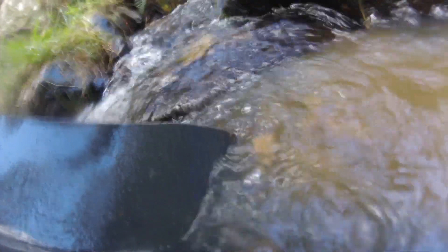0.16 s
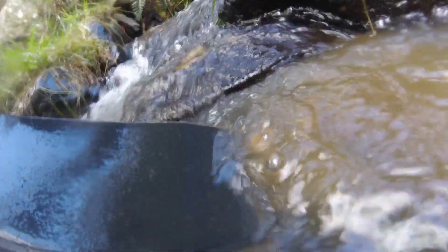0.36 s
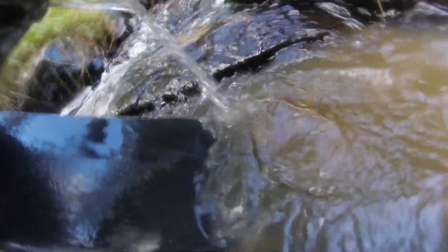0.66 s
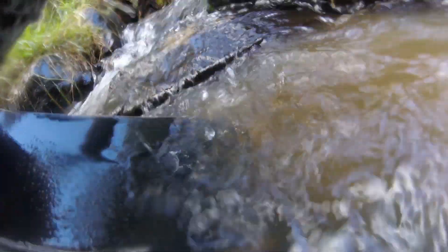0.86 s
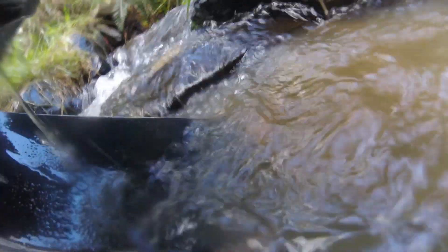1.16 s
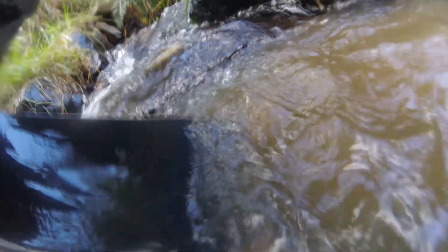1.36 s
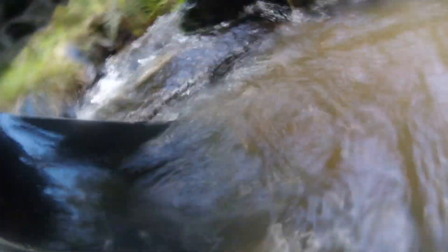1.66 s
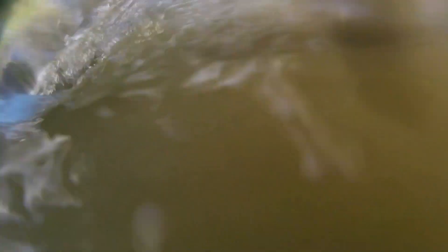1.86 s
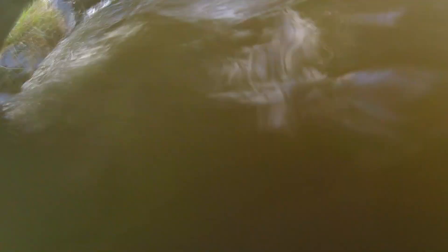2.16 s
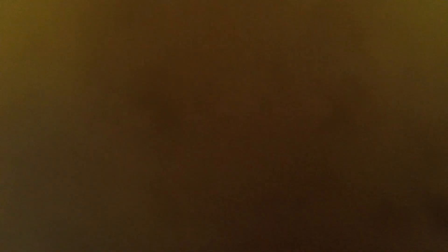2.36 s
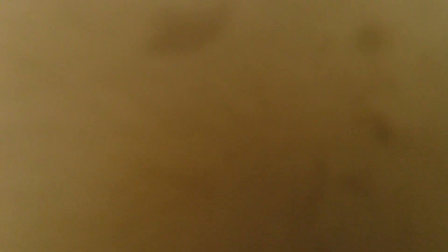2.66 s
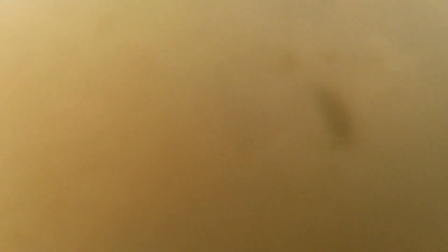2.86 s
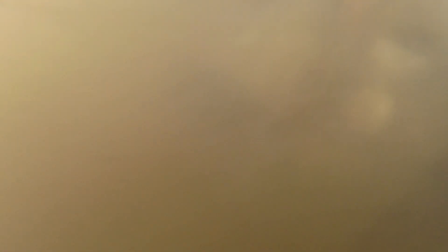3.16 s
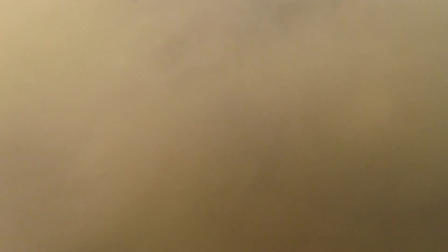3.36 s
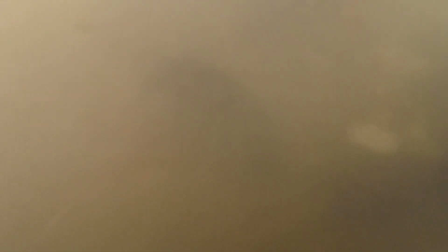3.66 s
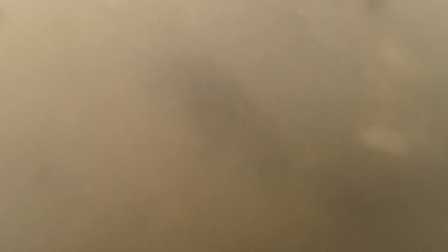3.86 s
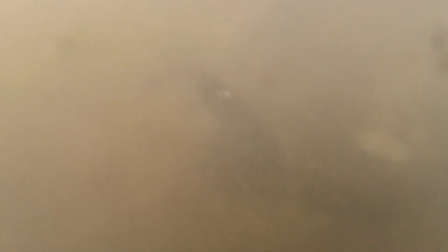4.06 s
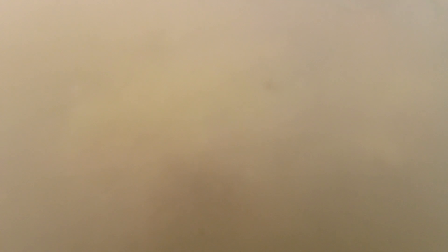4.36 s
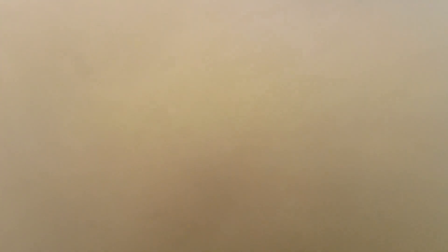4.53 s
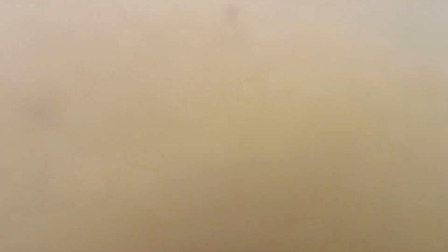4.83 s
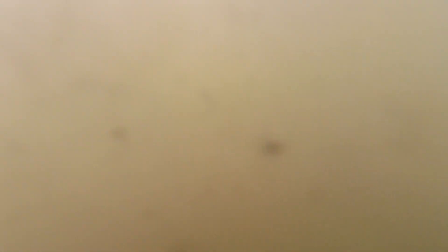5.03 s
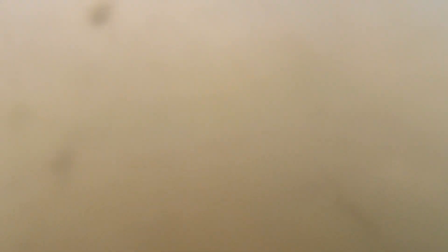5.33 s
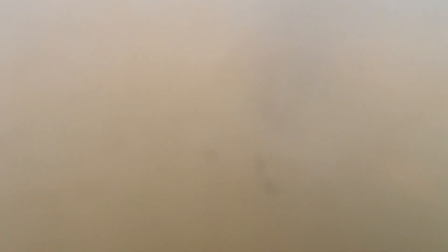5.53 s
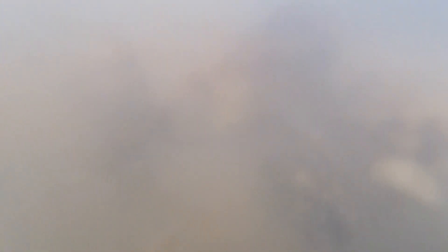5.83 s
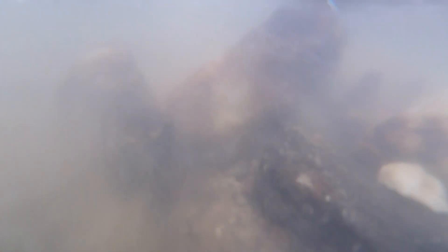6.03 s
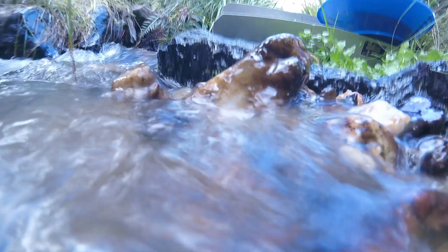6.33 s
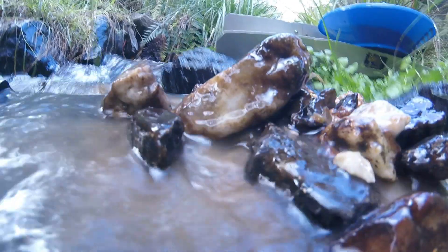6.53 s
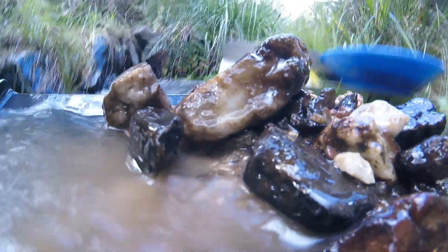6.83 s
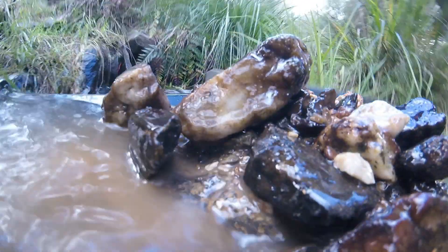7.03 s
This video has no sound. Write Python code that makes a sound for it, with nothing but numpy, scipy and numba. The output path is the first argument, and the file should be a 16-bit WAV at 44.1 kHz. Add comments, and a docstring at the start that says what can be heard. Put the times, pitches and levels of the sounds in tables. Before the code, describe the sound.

Close, mono and enclosed sound from a waterproof camera dipped in a creek. First come rough surface lapping, deep buffeting, bright spray and high sputtering ringing. After a brief lull it sinks with a bubble's gulp, and boxy stone knocks, gritty grinding, pebble taps and glugs crowd together. Finally the case jolts into air, rings low, sheds a few drops, and the muffled creek runs quietly.

```python
"""A stony creek, into which a waterproof camera is dipped and lifted out again.
At the surface the current slaps the case and fizzes and rings in the wet microphone port: filtered clicks, swept resonances.
Under water, stones knock and gravel scrapes: short contacts ring the modes of the flooded case while bubbles gurgle.
Back in air the case rings on and sheds drops, and the creek rushes on dully behind the wet port as coloured clicks."""
import sys
import numpy as np
from scipy import signal
from scipy.fft import rfft, irfft
from scipy.io import wavfile
from scipy.ndimage import uniform_filter1d, minimum_filter1d, map_coordinates
from numba import njit

SR = 44100
rng = np.random.default_rng(int(sys.argv[2]) if len(sys.argv) > 2 else 0)


def transcribe(u):
    """Save the signal u as a 16-bit wav file named by the first command-line argument.

    u: samples, shape (n,) or (channels, n), limited to [-1, 1]; the rate is SR.
    q: integer samples, one column per channel.
    """
    v = np.clip(np.atleast_2d(u).T, -1, 1)
    q = np.round(v * 32767).astype(np.int16)
    wavfile.write(sys.argv[1], SR, q)


N = 317199
TIME = np.arange(N) / SR
HIT = TIME[:8192]  # time axis of one short sound

# Moments of the dip: first water, last bright sheet, port sealed, case under water, case back in air
START_S, FLOOD_S, SEALED_S, PLUNGE_S, SURFACE_S = .076, 2.165, 2.229, 2.265, 6.25

# Modes of the flooded case: (frequency [Hz], width [Hz], level [dB])
FLOODED_MODES = [(91.2, 16, 2.5), (200.8, 33, -3), (274, 59, -11), (341, 65, -1), (398.7, 38, 0),
                 (512, 110, -6), (569.5, 16, -7), (701, 23.3, 5.5), (781, 69, -1.5), (886, 77, -8),
                 (945.5, 61, -3.5), (1260, 21, -20.5), (1670, 79, -13.5), (2030, 78, -17),
                 (2300, 110, -26.5), (2630, 65, -33), (3630, 160, -44.5), (5000, 140, -41),
                 (6240, 220, -52)]
# Spectrum of fizz in the wet port: (frequency [Hz], level [dB])
FIZZ_SPECTRUM = [(2500, -14), (4300, -3), (5400, 7.5), (6500, 5.5), (7800, -2), (9500, -11), (12000, -20.5),
                 (13500, -47.5)]
# Spectrum of a dull crack under water: (frequency [Hz], level [dB])
CRACK_SPECTRUM = [(100, -13), (400, 1), (900, -5), (1300, -13.5), (2100, -13), (2800, -25), (3400, -40),
                  (5200, -46.5), (8000, -60.5), (15000, -81.5)]
# Spectrum of water pattering: (frequency [Hz], level [dB])
PATTER_SPECTRUM = [(300, -30), (900, 11), (1300, -2), (2000, 10), (2800, -7), (3700, -5), (4300, -17),
                   (6000, -24), (9000, -50)]


def undb(db):
    """Decibels to gain."""
    return 10 ** (np.asarray(db) / 20)


def unit(x):
    """Scale to rms 1."""
    return x / np.sqrt(np.mean(x ** 2))


def peak(x):
    """Scale to peak 1."""
    return x / np.abs(x).max()


def between(start, end, ramp):
    """Gate from start to end with inside ramps, in seconds; it stays below 1 if the ramps do not fit."""
    return np.clip(np.minimum(TIME - start, end - TIME) / ramp, 0, 1)


def fade(t60):
    """Exponential decay of a hit, 60 dB in t60 seconds."""
    return np.exp(-np.log(1000) * HIT / t60)


def add(out, s, sound):
    """Mix a sound in at s seconds."""
    i = max(int(s * SR), 0)
    out[i:i + len(sound)] += sound[:N - i]


def noise_hit():
    """White noise as long as one short sound."""
    return rng.standard_normal(len(HIT))


def cut(x, hz, kind, order=3):
    """Low-, high- or band-pass."""
    return signal.sosfilt(signal.butter(order, hz, kind, fs=SR, output="sos"), x)


def colour(x, points, size=4096):
    """Minimum-phase filter that follows a (Hz, dB) spectrum."""
    hz, db = np.transpose(points)
    bins_hz = np.arange(size // 2 + 1) * SR / size
    gain = undb(np.interp(np.log(bins_hz + 1), np.log(hz), db))
    # Folding the cepstrum makes the filter causal
    cepstrum = irfft(np.log(gain))
    cepstrum[1:size // 2] *= 2
    cepstrum[size // 2 + 1:] = 0
    impulse = irfft(np.exp(rfft(cepstrum)))
    return signal.fftconvolve(x, impulse)[:len(x)]


def resonate(x, hz, width):
    """One resonance, gain 1 at its centre."""
    return signal.lfilter(*signal.iirpeak(hz, hz / width, fs=SR), x)


def ring(x, modes, scatter_db, detune=0):
    """Modes driven by x; each contact weights and detunes them anew, and none carries far above its pitch."""
    chance = rng.standard_normal((len(modes), 3))
    out = 0
    for (hz, width, db), (sign, weight, shift) in zip(modes, chance):
        mode = resonate(x, hz * (1 + detune * shift), width)
        mode = resonate(mode, hz, hz)  # a broad second pass drops what lies far from the mode
        out = out + np.sign(sign) * undb(db + scatter_db * weight) * mode
    return out


@njit
def glide(x, hz, width):
    """A resonance whose centre moves from sample to sample."""
    y, band, low = np.empty(len(x)), 0., 0.
    for i in range(len(x)):
        g, k = np.tan(np.pi * hz[i] / SR), width / hz[i]
        v = (band + g * (x[i] - low)) / (1 + g * (g + k))
        band, low, y[i] = 2 * v - band, low + 2 * g * v, k * v
    return y


def walk(rate):
    """Smooth random wandering with rate new values a second, spread near 1."""
    k = int(SR / rate)
    steps = np.repeat(rng.standard_normal(N // k + 1), k)
    return 1.3 * uniform_filter1d(uniform_filter1d(steps, k), k)[:N]


def wander(x, depth, rate):
    """Let the pitch of a steady sound drift by a share, as water and grip load the case."""
    position = np.cumsum(1 + depth * walk(rate))
    return map_coordinates(x, [position], order=3, mode="mirror")


def clicks(rate, spread_db, size=2048):
    """Random clicks of very unequal strength whose power stays even over longer stretches."""
    hits = rng.random(N) < rate / SR
    x = hits * rng.standard_normal(N) * undb(spread_db * rng.exponential(size=N))
    return x / np.sqrt(np.abs(uniform_filter1d(x ** 2, size)) + 1e-9)


def bubbles(low_hz, high_hz, count, cycles=24, rise=0.21):
    """Small bubbles swell within a cycle, ring a few more and glide up as they near the surface; rms 1."""
    out, t = np.zeros(N), HIT[:4096]
    for when, pitch, strength in rng.random((count, 3)):
        hz = low_hz * (high_hz / low_hz) ** pitch
        age = hz * t / cycles  # 1 when the ring has fallen by 60 dB
        envelope = (1 - np.exp(-(2 * hz * t) ** 2)) * np.exp(-np.log(1000) * age)
        tone = np.sin(2 * np.pi * hz * t * (1 + rise * age / 2))
        add(out, when * TIME[-1], undb(-18 * strength) * envelope * tone)
    return unit(out)


def swells(rows, attack, t60, rest_db):
    """Gain of (start s, length s, dB) swells: each rises, holds and dies away to a resting level."""
    gain = np.full(N, undb(rest_db))
    for s, length, db in rows:
        t = TIME[:N - int(s * SR)]
        decay = np.exp(-np.log(1000) * np.clip((t - length) / t60, 0, 2))
        shape = np.minimum(t / attack, 1) * decay
        gain[-len(t):] = np.maximum(gain[-len(t):], undb(db) * shape)
    return gain


def dragging():
    """How hard pushes of the camera over the bed scrape it, and how much they churn the water."""
    # Pushes: (start [s], length [s], scrape level [dB], churn level [dB])
    pushes = [(2.256, 0.034, -14.5, -18), (2.567, 0.033, -24.5, -28.5), (2.794, 0.035, -29.5, -25.5),
              (2.964, 0.14, -24, -17.5), (3.113, 0.12, -19.5, -22), (3.321, 0.22, -21, -22.5),
              (3.516, 0.13, -14, -23), (3.712, 0.39, -15.5, -17.5), (4.084, 0.03, -13.5, -21),
              (4.181, 0.089, -17.5, -20), (4.282, 0.12, -15, -24), (4.43, 0.084, -22, -26),
              (4.547, 0.12, -30.5, -33), (4.646, 0.13, -23, -25), (4.802, 0.036, -25.5, -25),
              (4.903, 0.074, -19, -18), (5.049, 0.1, -26, -30), (5.166, 0.097, -22.5, -18),
              (5.342, 0.11, -29.5, -30.5), (5.443, 0.19, -34.5, -34.5), (5.602, 0.12, -25.5, -29),
              (5.717, 0.097, -17.5, -19), (5.828, 0.19, -29, -23), (6.078, 0.23, -30, -39),
              (6.192, 0.03, -21, -23)]
    attack_s, t60_s = 0.027, 0.42
    s, length, scrape, churn = np.transpose(pushes)
    return (swells(zip(s, length, scrape), attack_s, t60_s, rest_db=-37),
            swells(zip(s, length, churn), attack_s, t60_s, rest_db=-36.5))


def current():
    """How strongly surges of the current wash along the case, sway it and fizz over the port."""
    # Surges: (start [s], length [s], wash level [dB], sway level [dB], fizz level [dB])
    surges = [(0.07, 0.1, -39.5, -18, -60), (0.15, 0.17, -31.5, -18.5, -54.5), (0.386, 0.12, -30, -21, -46),
              (0.717, 0.098, -28, -17, -37.5), (0.863, 0.082, -26.5, -21.5, -44),
              (0.97, 0.038, -33, -15, -43), (1.027, 0.065, -34, -24.5, -42.5),
              (1.136, 0.1, -37, -25.5, -49), (1.27, 0.044, -32, -28, -39.5),
              (1.34, 0.14, -32.5, -19, -43.5), (1.508, 0.16, -38, -30, -52.5),
              (1.722, 0.082, -22.5, -18.5, -31.5), (1.848, 0.05, -42, -29, -43),
              (2.054, 0.14, -47, -46, -51)]
    attack_s = 0.042
    s, length, wash, sway, fizz = np.transpose(surges)
    return (swells(zip(s, length, wash), attack_s, t60=0.32, rest_db=-45.5),
            swells(zip(s, length, sway), attack_s, t60=0.35, rest_db=-43),
            swells(zip(s, length, fizz), attack_s, t60=0.18, rest_db=-55.5))


def breaking():
    """Strength of the breaking wavelets and of their spray: a quick rise and a short decay each."""
    # Wavelets that break on the case: (time [s], slap level [dB], spray level [dB])
    slaps = [(0.076, -12, -54), (0.155, -25, -52), (0.224, -10, -48), (0.248, -4.5, -12.5),
             (0.305, -10.5, -47), (0.456, -16.5, -57.5), (0.505, -1.5, -36), (0.792, -18.5, -14.5),
             (0.823, -8, -39), (0.929, -15.5, -21), (0.956, -17, -24), (1.01, -17, -29),
             (1.07, -18.5, -17.5), (1.142, -12.5, -14.5), (1.33, -7.5, -17), (1.4, -5.5, -19.5),
             (1.411, -10, -27.5), (1.591, -20, -48), (1.756, -13, -22), (1.771, -14, -10),
             (1.793, -6.5, -14), (1.82, -13, -38.5), (2.163, -24, -21)]
    slap, spray = np.zeros(N), np.zeros(N)
    rise = 1 - fade(0.0096)
    for s, db, spray_db in slaps:
        add(slap, s, undb(db) * peak(rise * fade(0.045)))
        add(spray, s, undb(spray_db) * peak(rise * fade(0.028)))
    return slap, spray


def flooded(x, scatter_db, crack_db, detune=0):
    """Contacts heard through the flooded case: its modes and a dull direct crack, as low, middle and high parts."""
    y = ring(x, FLOODED_MODES, scatter_db, detune) + undb(crack_db) * colour(x, CRACK_SPECTRUM)
    return cut(y, 445, "low"), cut(y, [480, 1350], "band"), cut(y, 1090, "high", order=4)


def stones(knock_trim_db=-1, thud_trim_db=-6, crack_trim_db=1, case_db=-2, chatter=0.27, bite=.6):
    """Each stone bites, chatters as it seats, and sets off a brief ring, mostly near the case's strong mode
    around 700 Hz; the case answers."""
    # Larger stones that strike the case: (time [s], level [dB], ring [Hz], crack level [dB], t60 [s])
    knocks = [(2.265, -4.5, 840, -12.5, 0.013), (2.289, -6, 1045, -27, 0.067), (2.332, -8, 688, -52, 0.058),
              (2.585, -13.5, 770, -41, 0.05), (2.764, -37, 356, -37, 0.039),
              (3.131, -17, 690, -27.5, 0.042), (3.158, -3.5, 719, -18, 0.062),
              (3.218, -9.5, 714, -42, 0.026), (3.374, -16, 712, -40, 0.023), (3.395, -16, 420, -35, .03),
              (3.425, -9.5, 700, -27.5, 0.11), (3.497, -7.5, 740, -23, 0.045),
              (3.519, -6.5, 753, -24, 0.037), (3.546, -5, 733, -17, 0.035), (3.568, -10, 677, -29, 0.037),
              (3.589, -8.5, 710, -37, 0.037), (3.611, -6, 744, -14, 0.024), (3.624, -5, 834, -19, 0.05),
              (3.644, -4.5, 732, -28, 0.062), (3.692, -2.5, 688, -14.5, 0.036),
              (3.744, -12, 596, -43, 0.013), (3.753, -4.5, 527, -36, 0.012), (3.826, -5, 694, -16, 0.06),
              (3.853, -7.5, 715, -23, 0.038), (3.922, -6, 650, -33, 0.041), (3.949, -8, 713, -34, 0.044),
              (3.989, -8.5, 697, -27, 0.074), (4.049, -6, 707, -22.5, 0.023),
              (4.085, -3.5, 732, -16.5, 0.041), (4.101, -3, 720, -21, 0.033),
              (4.133, -6, 699, -26.5, 0.064), (4.174, -9.5, 680, -20.5, 0.03),
              (4.296, -5.5, 634, -23.5, 0.036), (4.321, -7, 790, -16, 0.027),
              (4.378, -3.5, 528, -19, 0.039), (4.416, -10, 715, -31, 0.038),
              (4.513, -7.5, 494, -35.5, 0.029), (4.668, -14.5, 650, -53, 0.049),
              (4.703, -5.5, 566, -19, 0.015), (4.747, -12.5, 596, -29.5, 0.027),
              (4.779, -4, 740, -21.5, 0.025), (4.8133, -3.5, 564, -15, 0.033), (4.827, -2, 680, -19, 0.035),
              (4.864, -4.5, 663, -28.5, 0.038), (4.936, -5, 673, -15.5, 0.025),
              (4.958, -3.5, 737, -19.5, 0.033), (4.994, -9, 940, -28.5, 0.023),
              (5.077, -15.5, 954, -28.5, 0.026), (5.185, -12.5, 714, -30, 0.052),
              (5.224, -9, 606, -47, 0.021), (5.242, -16, 735, -22.5, 0.025), (5.328, -4, 939, -19, 0.034),
              (5.399, -16, 857, -33.5, 0.056), (5.632, -17, 504, -37, 0.038),
              (5.702, -2.5, 708, -10.5, 0.026), (5.738, -13.5, 694, -31, 0.031),
              (5.757, 0.5, 725, -28, 0.044), (5.782, -1.5, 813, -16.5, 0.029), (5.792, -8, 796, -36, 0.04),
              (5.803, -12, 765, -31, .03), (5.816, -7, 690, -38.5, 0.039), (5.826, -7.5, 726, -32, 0.045),
              (5.859, -14, 980, -31, .025), (5.907, -4, 950, -28.5, 0.045), (5.936, -11.5, 724, -39, 0.054),
              (5.994, -14, 674, -44.5, 0.028), (6.101, -9, 450, -28, 0.042),
              (6.184, -21.5, 720, -33, 0.042), (6.217, -9, 400, -25.5, 0.04), (6.239, -13, 944, -34, 0.037),
              (6.307, -13.5, 431, -33, 0.034)]
    middling_hz, thud_db_per_octave = 630, 12  # knocks that ring lower thud more
    out = np.zeros(N)
    for s, db, hz, crack_db, t60 in knocks:
        contact = chatter * noise_hit() * fade(t60) * (1 - fade(0.0056))
        contact[0] += bite
        low, middle, high = flooded(contact, 3.3, crack_db=-2.5, detune=.02)
        own = np.sin(2 * np.pi * hz * HIT) * fade(t60) * (1 - fade(.013))
        knock = undb(knock_trim_db) * peak(peak(own) + undb(case_db) * peak(middle))
        thud_db = thud_trim_db + thud_db_per_octave * np.log2(middling_hz / hz)
        thud = undb(thud_db) * peak(cut(low, 290, "low", order=1))
        crack = undb(crack_db + crack_trim_db) * peak(high)
        add(out, s, undb(db) * (knock + thud) + crack)
    return out


def gravel(scrape, churn, scrape_trim_db=-3.0, churn_trim_db=-1, grit_db=-19.0, gurgle_db=-3, grit_growth=1.14):
    """Gravel grinds in uneven slips that ring the case, churned water gurgles, and a gritty wash grows with the scraping."""
    # Spectrum of the gritty wash: (frequency [Hz], level [dB])
    scrape_spectrum = [(600, -22), (1000, -2), (1250, 5), (1430, -4.5), (1650, 3), (1880, -3.5),
                       (2100, -1.5), (2450, -6), (2820, -7), (3250, -24), (4300, -26), (5100, -27),
                       (7000, -41), (11000, -62)]
    spurts = undb(2.6 * walk(70))
    low, middle, _ = flooded(clicks(700, 1.8), 0.24, crack_db=-12.5)
    gurgle = bubbles(126.6, 442, count=260, cycles=12, rise=0.22)
    low = unit(unit(low) + undb(gurgle_db) * gurgle)
    middle = unit(wander(middle, .022, 14) * spurts)
    grit = unit(colour(clicks(3000, 2.5), scrape_spectrum) * spurts)
    grit_gain = undb(grit_db + 0.68 * walk(38)) * scrape.max() * (scrape / scrape.max()) ** grit_growth
    mix = churn * undb(churn_trim_db) * low + scrape * undb(scrape_trim_db) * middle + grit * grit_gain
    return mix * between(PLUNGE_S, 6.3, 0.024)


def pebbles(scrape, per_s=28, pebble_db=5, tick_db=-6, scatter_db=4.0):
    """Small pebbles tap the case at random, as hard as it is being pushed."""
    contacts = (rng.random(N) < per_s / SR) * undb(scatter_db * rng.standard_normal(N))
    chatter = noise_hit() * fade(0.0047)
    low, middle, high = flooded(signal.fftconvolve(contacts, chatter)[:N], 1.5, crack_db=-7.5)
    taps = undb(pebble_db) * peak(low + middle)
    bright = undb(tick_db) * peak(cut(high, 5300, "low", order=2))
    return scrape * (taps + bright) * between(PLUNGE_S, SURFACE_S, 0.06)


def sand(scrape, sand_db=-51, per_s=2000, spread_db=3.5, growth=0.7):
    """Sand grains tick directly on the case, in flurries that grow louder with the scraping."""
    grains = clicks(per_s, spread_db) * undb(3 * walk(25))
    grains = cut(cut(grains, 1500, "high", order=2), 5000, "low")
    return undb(sand_db) * scrape ** growth * unit(grains) * between(2.9, SURFACE_S, 0.14)


def ticks(trim_db=-4, t60=0.0016):
    """Faint, sharp ticks: very brief bursts of bright noise with no ring."""
    # Ticks: (time [s], level [dB])
    tick_hits = [(3.569, -34.5), (3.836, -28), (3.891, -29.5), (4.335, -28), (4.833, -31.5), (5.333, -29.5),
                 (5.825, -34)]
    out = np.zeros(N)
    for s, db in tick_hits:
        tick = cut(noise_hit() * fade(t60), [2500, 9500], "band", order=2)
        add(out, s, undb(db + trim_db) * peak(tick))
    return out


def rub(db=-14, slip_hz=147, weak=0.15, case_db=-9):
    """The case drags on something smooth: it sticks and slips, strong and weak in turn, in a short groan."""
    slips = np.floor(np.cumsum(slip_hz * (1 + .025 * walk(60))) / SR)
    pulses = np.diff(slips, prepend=0) * np.where(slips % 2, weak, 1)
    direct = unit(cut(pulses, [90, 400], "band"))
    answer = unit(cut(ring(pulses, FLOODED_MODES, .3), 810, "low"))
    groan = unit(direct + undb(case_db) * answer)
    return undb(db) * groan * between(2.985, 3.118, 0.025)


def plunge(snap_db=-12, froth_db=-18, gulp_db=2, gulp_hz=1214, gulp_s=2.302, pop_db=-11):
    """The last air snaps out of the port, and the water closes over the case with the gulp of a bubble."""
    froth = unit(cut(clicks(3300, 2.8), [1100, 3000], "band"))
    out = undb(froth_db) * froth * between(2.28, 2.318, 0.054)  # the gate only opens to about a third
    snap = colour(noise_hit() * fade(0.0019), FIZZ_SPECTRUM)
    add(out, PLUNGE_S, undb(snap_db) * peak(snap))
    gulp = peak(np.sin(2 * np.pi * gulp_hz * HIT) * fade(0.02) * (1 - fade(0.01)))
    pop = peak(cut(colour(noise_hit() * fade(0.014), CRACK_SPECTRUM), 1440, "high"))
    add(out, gulp_s, undb(gulp_db) * gulp + undb(pop_db) * pop)
    return out


def glugs(trim_db=-1, rough=0.42):
    """Air folded under the water rings as a big, trembling bubble that glides as it shrinks or spreads."""
    # Air pockets: (time [s], level [dB], pitch [Hz], t60 [s], glide [octaves/s])
    pockets = [(0.157, -12.5, 388, 0.048, -6), (0.22, -15, 424, 0.077, 0), (0.239, -17, 470, 0.055, 3),
               (0.305, -12, 304, 0.041, -3), (1.012, -24, 340, 0.053, 3), (1.105, -37, 720, .09, 19),
               (1.235, -41, 680, 0.12, 13), (1.333, -19, 365, 0.061, 7), (1.52, -31, 690, 0.11, 12),
               (1.585, -33.5, 626, 0.14, 5), (1.821, -15.5, 795, 0.022, 13), (1.843, -23, 560, .035, 3),
               (2.323, -16, 804, 0.098, -3), (2.35, -11.5, 590, .05, 1.5), (2.366, -15, 720, .04, 1),
               (2.367, -23, 1130, 0.021, 7), (2.39, -20.5, 600, 0.037, 3), (2.404, -13, 768, 0.037, 12),
               (2.427, -16, 624, 0.046, 1.5), (2.451, -17.5, 704, 0.031, 7),
               (2.519, -17.5, 736, 0.11, -0.5), (2.602, -20.5, 783, 0.076, 2), (2.819, -12, 396, 0.032, -5),
               (2.835, -17, 374, 0.036, -1), (3.744, -4.5, 297, 0.082, -2.5), (3.764, -9.5, 152, 0.045, 3),
               (4.253, -10, 341, 0.036, 8), (4.976, -14, 389, 0.044, -1.5), (5.003, -18, 292, 0.043, -3),
               (5.764, -11.5, 160, .04, -9), (5.868, -8.5, 372, 0.068, -15.5), (5.884, -11, 170, 0.097, -6),
               (6.012, -26, 230, 0.052, -10), (6.672, -27, 434, .05, 4), (6.944, -22.5, 149.6, 0.051, -34)]
    out = np.zeros(N)
    for s, db, hz, t60, octaves_per_s in pockets:
        phase = 2 * np.pi * np.cumsum(hz * 2 ** (octaves_per_s * HIT)) / SR
        tremble = rough * unit(cut(noise_hit(), 160, "low", order=2))
        tone = np.sin(phase) + tremble * np.cos(phase)
        add(out, s, undb(db + trim_db) * peak(tone * fade(t60) * (1 - fade(0.0054))))
    return out


def surface(flow, fizzing, slap, spray, wash_trim_db=-1.0, slap_trim_db=-12, spray_trim_db=-13,
            sheet_db=-19, sheet_rise_db=7, body_db=-4, bubble_db=-7):
    """Water washes along the case in a rough patter that rings it and traps bubbles, and fizzes over the port."""
    # Modes of the case half under water: (frequency [Hz], width [Hz], level [dB])
    wet_modes = [(420, 110, 3), (1246, 59, -4.5), (1696, 92, 4.5), (2243, 86, -6)]
    # Spectrum of the wash: (frequency [Hz], level [dB])
    wash_spectrum = [(60, -14), (150, 9.5), (240, 4.5), (400, 7.5), (600, 1), (820, -2), (1000, -3.5),
                     (1900, -2.5), (2800, -9), (3400, -10), (4200, -22.5), (6500, -17.5), (10000, -43.5),
                     (13500, -63)]
    # Spectrum of the last sheet of water: (frequency [Hz], level [dB])
    sheet_spectrum = [(100, 7.5), (200, -1), (360, 0), (600, -5.5), (1100, -8), (2100, -13), (3900, -19),
                      (5200, -17.5), (6550, -3.5), (7500, -13), (10200, -19), (11500, -82), (13000, -86)]
    patter = clicks(4500, 1.2)
    body = unit(wander(ring(patter, wet_modes, .3), .03, 13))
    trapped = bubbles(450, 2000, count=420, cycles=23, rise=0.17)
    wash = unit(unit(colour(patter, wash_spectrum)) + undb(body_db) * body + undb(bubble_db) * trapped)
    wash = wash * (undb(wash_trim_db) * flow + undb(slap_trim_db) * slap)
    fizz = unit(colour(clicks(4000, 1.3), FIZZ_SPECTRUM))
    fizz = fizz * (fizzing + undb(spray_trim_db) * spray)
    lapping = undb(2.0 * walk(110)) * (wash + fizz)
    # A last bright sheet of water grows until the port seals
    growth_db = np.interp(TIME, [FLOOD_S, SEALED_S], [-sheet_rise_db, 0])
    sheet = unit(colour(clicks(7700, 2.4), sheet_spectrum))
    sheet = undb(sheet_db + growth_db + 2 * walk(150)) * sheet
    return (lapping * between(START_S, SEALED_S + 0.033, 0.0025)
            + sheet * between(FLOOD_S, SEALED_S, 0.00093))


def port(flow, slap, rest_hz=5600, covered_hz=6550, width_hz=330.0, crest_trim_db=-1, rest_trim_db=-13,
         covered_db=5, slap_trim_db=-13):
    """The port's air pocket rings higher as a wavelet squeezes it, loudest if it breaks, then sinks back."""
    # Water climbs over the port: (crest time [s], level [dB], top pitch [Hz])
    crests = [(0.2, -40, 6400), (0.43, -62, 5960), (0.512, -48, 6280), (0.625, -50, 5990),
              (0.843, -29, 6540), (0.949, -24, 6560), (1.168, -48, 6340), (1.403, -23, 7170),
              (1.555, -37.5, 6550), (1.598, -52, 6500), (1.77, -22, 6790)]
    covered = between(1.84, TIME[-1], 0.0412)  # the water now stays over the port
    base_hz = rest_hz + (covered_hz - rest_hz) * covered
    hz, level = base_hz, flow * undb(rest_trim_db + covered_db * covered)
    for s, db, top_hz in crests:
        crest = np.exp(-np.minimum(((TIME - s) / 0.019) ** 2 / 2, 20))
        hz = np.maximum(hz, base_hz + (top_hz - base_hz) * np.sqrt(crest))
        level = level + undb(db + crest_trim_db) * crest ** 2 + undb(slap_trim_db) * slap * crest
    hz = hz * (1 + .03 * walk(110) * (1 - covered))  # ripples until covered
    level = level * undb(3 * walk(140) - 1.5)  # sputters
    ringing = unit(glide(glide(clicks(5000, 1.5), hz, width_hz), hz, width_hz))
    return level * ringing * between(START_S, SEALED_S, 0.0038)


def sweeps(width_hz=400.0):
    """As a wave rolls over the port, its air pocket swells or shrinks and the ring slides quickly."""
    # Slides: (time [s], length [s], level [dB], start [Hz], end [Hz])
    slides = [(1.759, 0.01993, -11, 7430, 4750), (1.871, 0.023, -29, 6000, 8100)]
    out = np.zeros(N)
    for s, length, db, start_hz, end_hz in slides:
        hz = np.geomspace(start_hz, end_hz, int(length * SR))
        ringing = glide(rng.standard_normal(len(hz)), hz, width_hz)
        ringing = glide(ringing, hz, 2 * width_hz)
        add(out, s, undb(db) * peak(ringing * np.hanning(len(hz))))
    return out


def emerging():
    """Two jolts as the case breaks the surface; freed of the water's damping it rings on."""
    # Tones of the case as it leaves the water: (frequency [Hz], level [dB], t60 [s])
    case_tones = [(91.5, -11, 0.56), (201, -12, 0.22), (417, -17, 0.26), (740, -23, 0.22)]
    out, t, chord = np.zeros(N), TIME[:SR], 0
    for hz, db, t60 in case_tones:
        chord = chord + undb(db) * np.sin(2 * np.pi * hz * t) * np.exp(-np.log(1000) * t / t60)
    for s, jolt_db in [(6.217, -1.5), (6.308, -8)]:
        add(out, s, undb(jolt_db) * chord)
    return out


def drops(case_tap_db=-4, trickle_db=-49, plink_db=-7, case_db=-1):
    """Water trickles off the case in spurts, and drops tap and spatter on it, each in a different place."""
    # Drops that run off and hit the case: (time [s], level [dB])
    drop_hits = [(6.032, -26), (6.1393, -29), (6.158, -26.5), (6.354, -28), (6.438, -27.5), (6.498, -32),
                 (6.528, -23), (6.586, -28), (6.624, -8.5), (6.669, -35), (6.733, -44), (6.941, -35.5),
                 (7.032, -33.5)]
    # Modes of the case in air: (frequency [Hz], width [Hz], level [dB])
    dry_modes = [(260, 190, 3.5), (446, 15, 12.5), (640, 41, -8), (825, 34, -3), (1045, 27, 6),
                 (1326, 84, 0), (2044, 47, 1), (2700, 110, -9.5), (3410, 83, -5), (4900, 240, -25),
                 (6200, 900, -44.5)]
    patter = clicks(510, 4.2) * undb(3.5 * walk(45))
    trickle = unit(colour(patter, PATTER_SPECTRUM))
    trickle = trickle + undb(case_db) * unit(ring(patter, dry_modes, .5))
    trickle = trickle + undb(plink_db) * bubbles(1000, 3300, count=500)
    out = undb(trickle_db) * trickle * between(6.2, 6.72, 0.11)
    for s, db in drop_hits:
        contact = noise_hit() * fade(0.03) * (1 - fade(0.0023))
        tap = peak(colour(contact, PATTER_SPECTRUM))
        tap = tap + undb(case_tap_db) * peak(ring(contact, dry_modes, 1.9))
        add(out, s, undb(db) * peak(tap))
    return out


def creek(rush_db=-39, babble_db=-53, spatter_db=-61):
    """The riffle behind the wet port: an uneven rush with small bubbles and spatter in it."""
    # Spectrum of the muffled rush: (frequency [Hz], level [dB])
    creek_spectrum = [(12, -40), (20, 7.5), (42, 0), (54, -6), (70, 6.5), (145, -9), (217, -7.5),
                      (307, -13.5), (1230, -25.5), (1660, -17), (2830, -36), (3700, -37.5), (6150, -56),
                      (12000, -72), (15600, -73), (22000, -120)]
    rush = undb(rush_db) * unit(colour(clicks(3000, 1.1) * undb(1.8 * walk(24)), creek_spectrum))
    babble = undb(babble_db) * bubbles(900, 2600, count=900, cycles=42, rise=.05)
    spatter = undb(spatter_db) * unit(colour(clicks(120, 4), PATTER_SPECTRUM))
    return (rush + babble + spatter) * between(SURFACE_S, 8, 0.047)  # runs to the end


def buffeting(sway, churn, thump_trim_db=-1, deep_db=-44, drag_trim_db=-11):
    """The current and the dragging sway the camera, and each shove rings it low for a few cycles."""
    # Water that shoves the case: (time [s], level [dB], pitch [Hz])
    thumps = [(0.076, -16, 86), (0.157, -11.5, 99.4), (0.26, -6, 99.5), (0.306, -5, 113.6),
              (0.411, -6.5, 87), (0.453, -6.5, 93.5), (0.477, -5.5, 82.5), (0.509, -4, 85),
              (0.922, -7, 110.3), (0.96, -11, 86), (1.331, -10, 98), (1.409, -7.5, 104.5),
              (1.463, -7.5, 55.7), (1.765, -11, 70), (1.818, -5, 97), (2.191, -16.5, 99),
              (2.274, -8.5, 129.4), (2.303, -7, 89), (4.14, -7.5, 97), (4.817, -16.5, 141),
              (4.979, -20, 74), (5.212, -17, 156), (5.242, -14.5, 62), (5.75, -4.5, 83), (5.871, -18.5, 83)]
    # Spectrum of the swaying rumble: (frequency [Hz], level [dB])
    rumble_spectrum = [(15, -3.5), (28, 1), (50, -7.5), (90, -8), (140, -11.5), (300, -47.5), (1000, -93)]
    out = np.zeros(N)
    for s, db, hz in thumps:
        thump = np.sin(2 * np.pi * hz * HIT) * fade(0.14) * (1 - fade(0.013))
        add(out, s, undb(db + thump_trim_db) * peak(thump))
    lapping = sway * between(START_S, PLUNGE_S, 0.024)
    stirred = undb(drag_trim_db) * churn * between(PLUNGE_S, 8.3, 0.037)  # runs to the end
    steady = undb(deep_db) * between(START_S, 6.6, 0.053)
    rumble = unit(colour(rng.standard_normal(N), rumble_spectrum))
    return out + (lapping + stirred + steady) * rumble


def scene():
    """Surface, plunge, creek bed, and air again."""
    flow, sway, fizzing = current()
    slap, spray = breaking()
    scrape, churn = dragging()
    bed = stones() + gravel(scrape, churn) + pebbles(scrape) + sand(scrape) + ticks() + rub()
    water = plunge() + glugs() + surface(flow, fizzing, slap, spray) + port(flow, slap) + sweeps()
    air = emerging() + drops() + creek()
    return (bed + water + air + buffeting(sway, churn))[None]


def record(dry, size=256):
    """The camera blocks the deepest rumble, its limiter holds down the peaks, and the top is cut."""
    ceiling, top_hz = .95, 15800
    x = cut(dry, 23, "high", order=1)
    gain = minimum_filter1d(ceiling / np.maximum(np.abs(x), ceiling), size)
    gain = uniform_filter1d(gain, size)
    return signal.sosfilt(signal.ellip(8, .2, 70, top_hz, fs=SR, output="sos"), x * gain)


dry = scene()
out = record(dry)
transcribe(out)
```